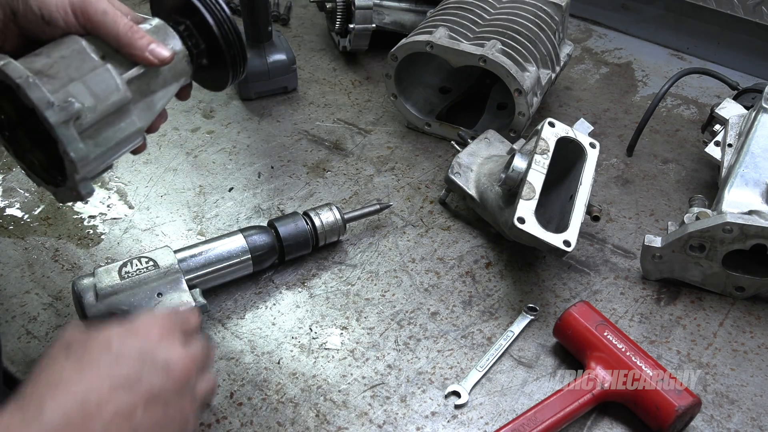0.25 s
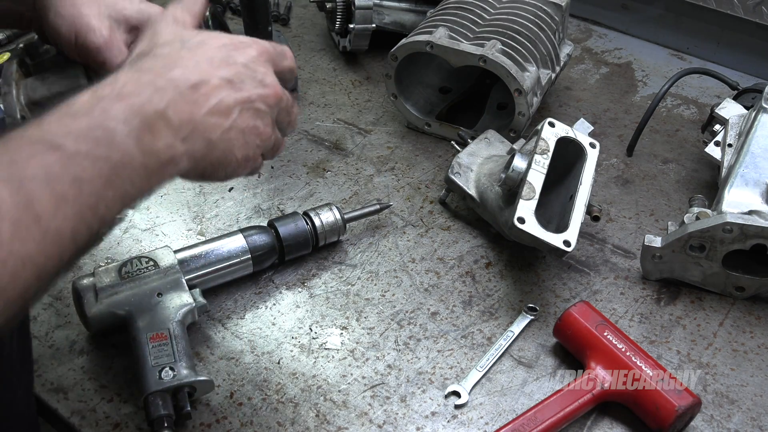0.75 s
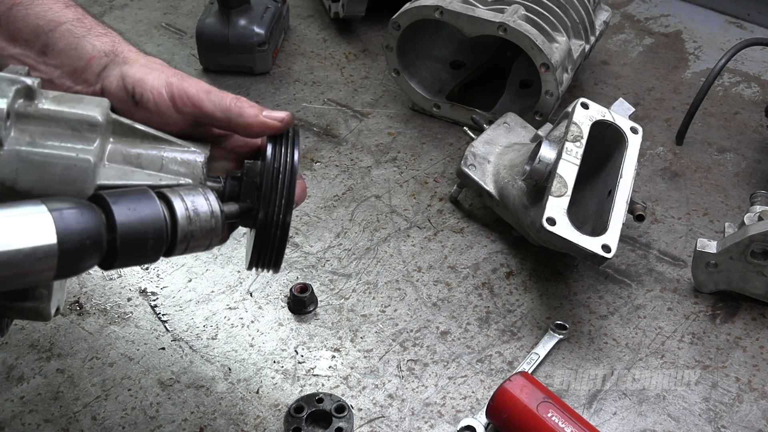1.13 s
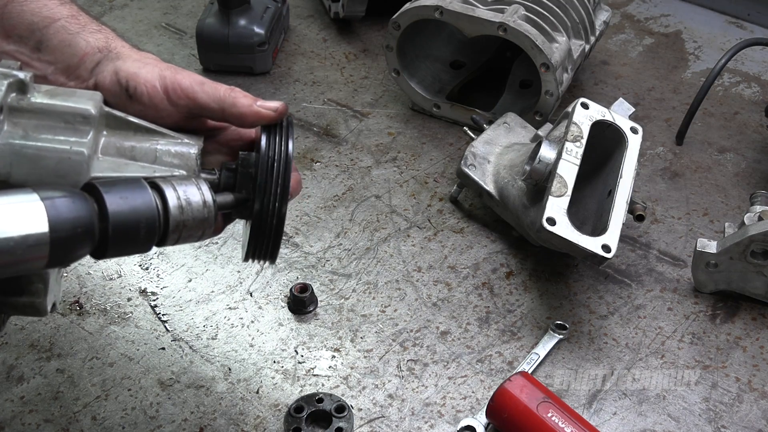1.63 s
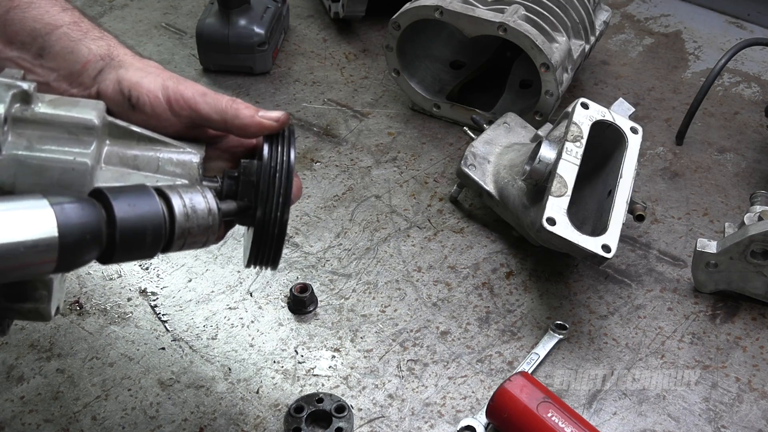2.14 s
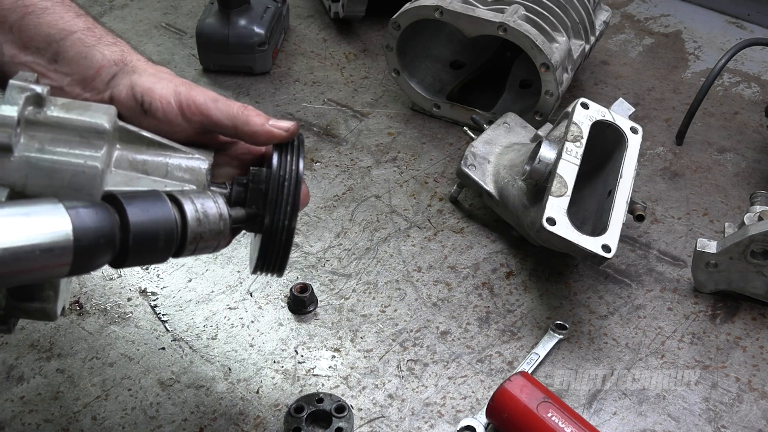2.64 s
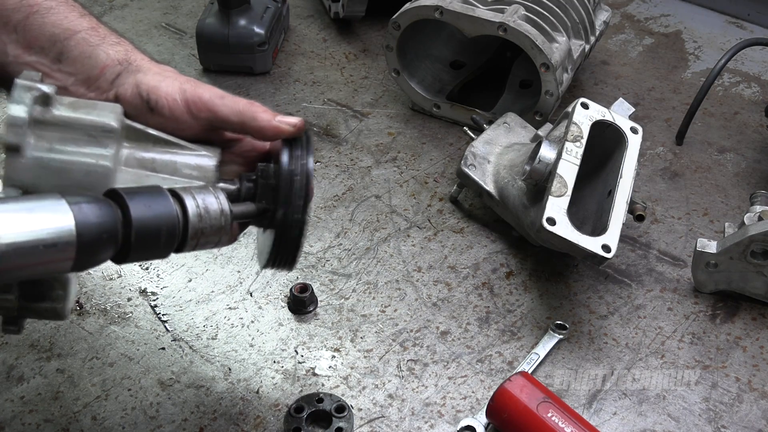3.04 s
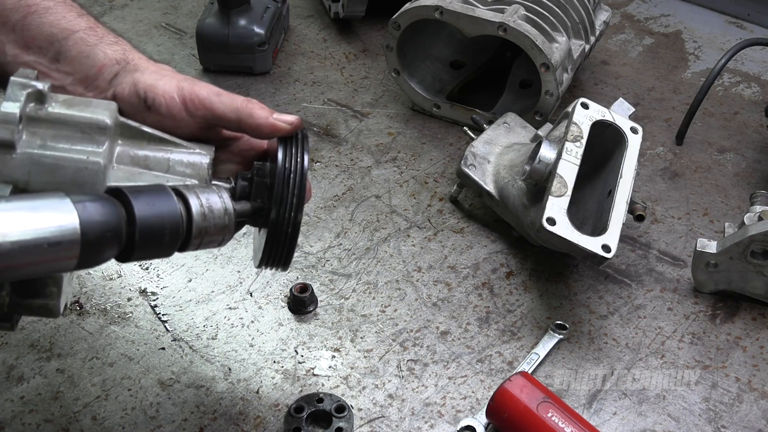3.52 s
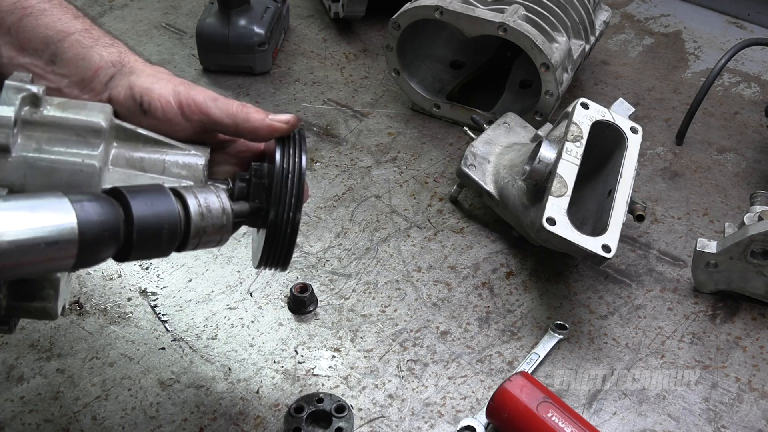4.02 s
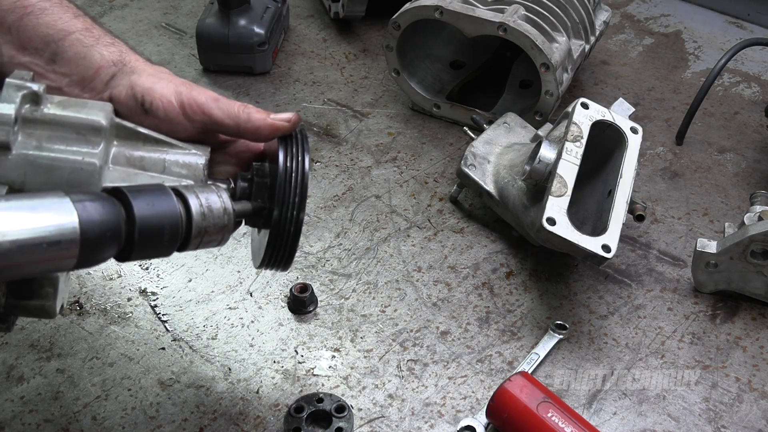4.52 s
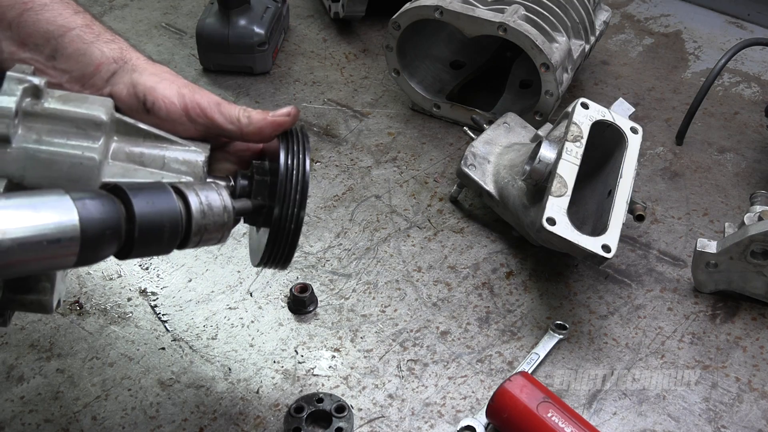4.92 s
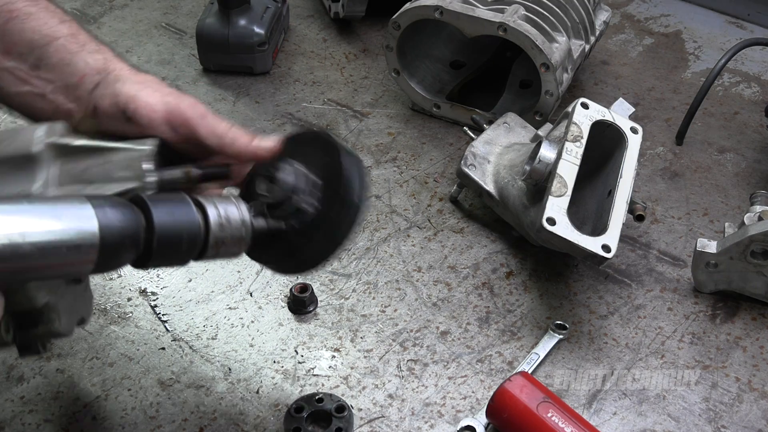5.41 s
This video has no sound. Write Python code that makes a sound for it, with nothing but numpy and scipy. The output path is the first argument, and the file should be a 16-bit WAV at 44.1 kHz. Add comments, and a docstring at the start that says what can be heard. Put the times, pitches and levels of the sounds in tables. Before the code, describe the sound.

An air hammer rattles against a steel pulley in short hissing bursts in an echoing garage, until the pulley comes free and rings.

```python
"""An air hammer drives a steel pulley off its shaft in fourteen short pulls, in a hard-walled garage.
Each pull hisses, kicks the piston and lands two to four blows, about 23 a second, which excite the
modes of the steel. The garage reverberates between pulls, over a faint rumble. The casing knocks
softly at the start; at the end the pulley comes free and sings, and the bit clinks against it.
A limiter flattens the blows."""
import sys
import numpy as np
from scipy import signal
from scipy.fft import rfft, irfft, next_fast_len
from scipy.io import wavfile
from scipy.ndimage import uniform_filter1d, minimum_filter1d

SR = 44100
rng = np.random.default_rng(int(sys.argv[2]) if len(sys.argv) > 2 else 0)


def inscribe(sig):
    """Save sig as 16-bit PCM at rate SR to the path in sys.argv[1].

    A 1-D sig is mono; a 2-D sig holds one channel per row.
    Samples are clipped to [-1, 1] before scaling.
    """
    pcm = np.round(np.clip(np.atleast_2d(sig).T, -1, 1) * 32767)
    wavfile.write(sys.argv[1], SR, pcm.astype(np.int16))


N = 249606

# background spectra: (frequency [Hz], relative level [dB])
RUMBLE_SPECTRUM = [(20, -12), (40, -9), (55, 3.5), (100, 2), (160, -15.5), (400, -22.5), (1500, -80)]
AIR_SPECTRUM = [(100, 6.5), (280, -1.5), (420, -3), (800, -1.5), (1300, -9.5), (2050, -10), (2700, -15),
                (3800, -18.5), (4600, -15), (5600, -19.5), (7800, -14), (12000, -20.5), (16000, -14)]
# course of the background: (time [s], rumble level [dB], air level [dB])
BACKGROUND_LEVELS = [(0, -43.5, -48), (.45, -40.5, -44.5), (.83, -37.5, -45), (.845, -41, -56),
                     (.92, -46, -49.5), (1.3, -71, -39), (2.6, -55, -59)]
# colour of the reverberation: (frequency [Hz], relative level [dB])
WALL_SPECTRUM = [(40, -2), (150, -6), (232, 11), (300, -0.5), (950, 5.5), (1400, 2.5), (2000, 6.5),
                 (3300, 0), (4500, 1.5), (5600, -4.5), (8800, 1.5), (10500, -6.5), (14300, -13),
                 (16000, -37)]
# reverberation times of near walls and diffuse echo: (frequency [Hz], t60 [s])
EARLY_T60 = [(7000, 0.26), (12000, .1)]
LATE_T60 = [(100, 1.1), (500, 1.4), (2000, 1.6), (4000, 1.55), (8000, 1.4), (11000, 1.15), (16000, .95)]
# the echo's loudness stays level after the last blow, longest in early pulls: (time [s], hold [s])
ECHO_HOLD = [(.92, 0.26), (2.2, 0.16), (3.6, 0.0066)]
# the top treble fades almost at once: (frequency [Hz], share of the hold [ratio])
ECHO_HOLD_SHARE = [(150, 0.44), (1000, 0.99), (4500, 0.77), (8400, 0.97), (11000, 0.1)]
# a louder echo is duller: (frequency [Hz], share of the rise above QUIET_ECHO_DB [ratio])
ECHO_RISE_SHARE = [(150, 0.93), (1000, 1), (4500, 1.1), (8400, 0.7946), (11000, 0.52)]
# resonances in the echo: the casing with the pulley tight and sliding, and the bit throughout:
# (frequency [Hz], bandwidth [Hz], relative level [dB])
CASING_TIGHT = [(2750, 530, -1), (4300, 370, -9), (8410, 200, 7)]
CASING_SLIDING = [(1970, 360, 2), (7400, 540, 2), (8130, 250, 3.5)]
BIT_RESONANCES = [(2005, 45, -4), (4115, 90, 4), (12990, 190, -6)]
# the casing rings most while the pulley moves: (time [s], relative level [dB])
CASING_RING_LEVELS = [(1.1, -5), (2.4, -0.5), (3.9, -1), (4.8, -4.5)]
# freely ringing modes: (frequency [Hz], level [dB], t60 [s])
CASING_MODES = [(850, -33, 0.047), (930, -46, 0.044), (1990, -47, .08)]
PULLEY_MODES = [(7920, -22, .85), (11350, -30, .7), (11330, -17, .06), (7900, -18, .08), (14900, -28, .05)]
BIT_MODES = [(4075, -10, 0.082), (4136, -10, 0.75), (8050, -19, 0.04), (8350, -18.5, 0.035),
             (13300, -33, .29)]
# spectra of valve hiss, air puff, slow push of air and impact: (frequency [Hz], relative level [dB])
HISS_SPECTRUM = [(300, 7.5), (1500, -1.5), (4000, 0), (7000, 3.5), (12000, -0.5), (16000, -6)]
PUFF_SPECTRUM = [(30, -0.5), (120, -8), (250, -2.5), (380, -7), (600, -12.5), (1000, -12), (2000, -67),
                 (5000, -34)]
PUSH_SPECTRUM = [(15, 2.5), (45, -15), (110, 6.5), (220, -5.5), (600, -14)]
CRACK_SPECTRUM = [(100, -16), (400, -8.5), (950, 2), (1500, -3), (2000, 1.5), (3000, -0.5), (4400, -1),
                  (5500, -9.5), (6700, -9), (8000, 3), (10000, -9.5), (13000, -13.5), (16000, -17)]
# hammered steel, pulley tight and sliding: (frequency [Hz], bandwidth [Hz], relative level [dB])
STEEL_TIGHT = [(2017, 43, 8.5), (2180, 33, -18.5), (2696, 68, -2.5), (3120, 98, -33), (3720, 59, -51.5),
               (4147, 72, 2), (4570, 46, -13), (5100, 38, -36), (7100, 28, -43), (8365, 53, 3.5),
               (9040, 120, -5), (12300, 160, -31)]
STEEL_SLIDING = [(914, 58, 2), (1985, 140, 8), (2760, 143, 0.5), (3220, 42, -8), (4008, 137, 4.5),
                 (4380, 170, 4.5), (7850, 35, -1), (7450, 13, -11), (7700, 130, -16), (8900, 7.2, 9),
                 (8700, 120, -4), (12700, 79, -0.5)]
# trigger pulls, with relative levels: (time [s], wait for first blow [s], blows [count],
# first stroke [s], lengthening per stroke [s], blow [dB], hiss [dB], kick [dB], echo [dB])
TRIGGER_PULLS = [(.918, 0.046, 3, 0.037, .004, -12.5, -16, -9.5, -18.5),
                 (1.305, 0.042, 3, 0.044, .005, -8.5, -15, -6, -22.5),
                 (1.644, 0.041, 2, .041, 0, -8.5, -17.5, -12, -23),
                 (1.930, 0.034, 3, 0.042, .003, -7.5, -22, -13.5, -23),
                 (2.222, 0.042, 3, 0.037, .007, -7, -23, -15, -25),
                 (2.705, .043, 2, 0.042, 0, -11.5, -26.5, -15.5, -26),
                 (3.02, 0.037, 3, 0.036, .006, -8, -30.5, -23.5, -24),
                 (3.467, .038, 3, .041, .027, -12, -32, -20.5, -28.5),
                 (3.777, 0.048, 2, 0.038, 0, -10, -32.5, -19, -25),
                 (4.106, .039, 2, .044, 0, -11.5, -28, -18.5, -27),
                 (4.432, 0.037, 2, 0.047, 0, -12.5, -35.5, -21, -28.5),
                 (4.685, 0.033, 2, 0.046, 0, -11, -37, -22, -26),
                 (4.969, .034, 2, 0.044, 0, -11, -44, -20.5, -27),
                 (5.259, 0.043, 4, 0.037, .013, -12, -29, -19.5, -27.5)]

KNOCK_S, RELEASE_S, CLINK_S = 0.585, 5.392, 5.6405
FIRST_CLATTER_S, CLATTER_S, LATE_SHORTENS_S, FADE_DB = 0.007, 0.011, 0.04, 1.4
EARLY_DB, QUIET_ECHO_DB, SWELL_S = -26, -27.5, 0.15


def amp(db):
    """Amplitude grows tenfold for every 20 dB."""
    return 10 ** (np.asarray(db) / 20)


def along(points, hz):
    """Interpolation of (frequency [Hz], value) points on a logarithmic frequency axis."""
    frequencies, values = np.transpose(points)
    return np.interp(np.log(hz + 1), np.log(frequencies), values)


def curves(rows):
    """Linear interpolation in time: one value per sample for each column after the first."""
    times, *columns = np.transpose(rows)
    return [np.interp(np.arange(N) / SR, times, column) for column in columns]


def filtered(x, response):
    """Linear filtering multiplies spectra; the response is scaled to keep the power of white noise."""
    size = next_fast_len(len(x) + SR // 4)
    gain = response(np.fft.rfftfreq(size, 1 / SR))
    return irfft(rfft(x, size) * gain / np.sqrt(np.mean(np.abs(gain) ** 2)), size)[:len(x)]


def noise(spectrum):
    """Spectral shaping turns white noise into coloured noise of rms 1."""
    x = filtered(rng.standard_normal(N), lambda hz: amp(along(spectrum, hz)))
    return x / np.sqrt(np.mean(x ** 2) + 1e-20)


def resonate(x, modes):
    """Modal superposition: x drives second-order resonators, summed with alternating sign."""
    def response(hz):
        return sum((-1) ** k * amp(db) * 1j * hz * width / (centre ** 2 - hz ** 2 + 1j * hz * width)
                   for k, (centre, width, db) in enumerate(modes))
    return filtered(x, response)


def sliding(x, tight, loose):
    """Equal-power crossfade: most of the energy passes to the loose modes as the pulley slides."""
    slid = curves([(2.3, 0.21), (3.2, 0.84)])[0]
    return np.sqrt(1 - slid) * resonate(x, tight) + np.sqrt(slid) * resonate(x, loose)


def bursts(source, rows, rise_s, steepness):
    """Envelopes with a power-law tail cut noise into bursts (time [s], level [dB], length [s])."""
    out, t = np.zeros(N + SR), np.arange(SR // 8) / SR
    for s, db, length in rows:
        start = round(s * SR)
        envelope = (1 - np.exp(-t / rise_s)) / np.sqrt(1 + (t / length) ** steepness)
        burst = envelope * source[start:start + len(t)]
        out[start:start + len(t)] += amp(db) * burst * np.linalg.norm(envelope) / np.linalg.norm(burst)
    return out[:N]


def background():
    """Ambient noise: a low rumble sinks as the work starts; faint air swells, then sinks too."""
    rumble_db, air_db = curves(BACKGROUND_LEVELS)
    return amp(rumble_db) * noise(RUMBLE_SPECTRUM) + amp(air_db) * noise(AIR_SPECTRUM)


def interference(x, depth_db):
    """Reflections add and cancel at random, leaving a fine ripple along the spectrum."""
    grid_hz = np.arange(0, SR / 2, 28)
    ripple_db = depth_db * rng.standard_normal(len(grid_hz))
    return filtered(x, lambda hz: amp(np.interp(hz, grid_hz, ripple_db)))


def echo_power(pull, hz, t):
    """The echo's loudness swells from the trigger, stays level briefly after the last blow, then fades."""
    start, *_, echo_db = pull
    level_db = QUIET_ECHO_DB + (echo_db - QUIET_ECHO_DB) * along(ECHO_RISE_SHARE, hz)
    swell = np.clip((t - start) / SWELL_S, 0, 1)
    hold_s = np.interp(start, *np.transpose(ECHO_HOLD)) * along(ECHO_HOLD_SHARE, hz)
    last_blow_s = strokes(pull)[-1][0]
    decaying_s = np.maximum(t - last_blow_s - hold_s, 0)
    return swell * amp(level_db - 60 * decaying_s / along(LATE_T60, hz)) ** 2


def garage():
    """Incoherent reflections add in power: an early echo for each blow, a diffuse one for each pull."""
    casing = sliding(rng.standard_normal(N), CASING_TIGHT, CASING_SLIDING)
    casing *= amp(curves(CASING_RING_LEVELS)[0])
    diffuse = interference(amp(-2) * noise(WALL_SPECTRUM) + casing, depth_db=2)
    diffuse += amp(-7) * resonate(rng.standard_normal(N), BIT_RESONANCES)
    hz, t, spectrogram = signal.stft(diffuse, SR, nperseg=512)
    early_t60 = along(EARLY_T60, hz[:, None])
    early = sum((t > s) * amp(EARLY_DB - 60 * np.maximum(t - s, 0) / early_t60) ** 2
                for s, _, _ in blows())
    late = sum(echo_power(pull, hz[:, None], t) for pull in TRIGGER_PULLS)
    return signal.istft(spectrogram * np.sqrt(early + late), SR)[1][:N]


def struck_steel(start_s, modes, rise_s, flutter):
    """Free vibration: each mode decays exponentially and flutters as the piece moves in the hand."""
    t = np.maximum(np.arange(N) / SR - start_s, 0)
    knots_s = np.arange(0, 2, 0.007)
    ring = np.zeros(N)
    for hz, db, t60 in modes:
        jitter = rng.standard_normal(len(knots_s)) + 1j * rng.standard_normal(len(knots_s))
        sway = np.interp(t, knots_s, 1 + flutter * jitter)  # in amplitude and phase
        ring += amp(db - 60 * t / t60) * np.imag(sway * np.exp(2j * np.pi * hz * t))
    return (1 - np.exp(-t / rise_s)) * ring


def barrel_thumps(rows, hz, peak_s):
    """Heavily damped oscillation: each thump (time [s], level [dB]) is a few cycles at a pitch near hz."""
    out, t = np.zeros(N + SR), np.arange(SR // 16) / SR
    envelope = t / peak_s * np.exp(1 - t / peak_s)
    for (s, db), detune in zip(rows, rng.standard_normal(len(rows))):
        pitch_hz = hz * np.exp(0.11 * detune)
        out[round(s * SR):][:len(t)] += amp(db) * envelope * np.sin(2 * np.pi * pitch_hz * t)
    return out[:N]


def exhaust():
    """Pressure release: the piston vents just before a blow, with a thump, a puff and a slow push."""
    vents = [(s, db) for s, db, _ in blows() if s < RELEASE_S + 0.03]
    thump = barrel_thumps([(s - 0.005, db) for s, db in vents], hz=293, peak_s=0.0012)
    puffs = [(s - 0.004, db - 8, 0.009) for s, db in vents]
    puff = bursts(noise(PUFF_SPECTRUM), puffs, rise_s=0.00094, steepness=3.23)
    pushes = [(s - 0.002, db, 0.03) for s, db in vents]
    push = bursts(noise(PUSH_SPECTRUM), pushes, rise_s=0.0018, steepness=7.4)
    return amp(-8) * thump + puff + amp(-18.5) * push


def trigger():
    """Flow noise: the valve opens with a hiss, and a moment later air pressure kicks the piston back."""
    hisses = [(s, hiss_db, 0.021) for s, *_, hiss_db, kick_db, echo_db in TRIGGER_PULLS]
    hiss = bursts(noise(HISS_SPECTRUM), hisses, rise_s=0.0021, steepness=3.8)
    kicks = [(s + 0.01488, kick_db) for s, *_, kick_db, echo_db in TRIGGER_PULLS]
    kicks.append((0.915, -10.5))  # the tool fills on the first pull
    puffs = [(s, db, 0.012) for s, db in kicks]
    puff = bursts(noise(PUFF_SPECTRUM), puffs, rise_s=0.00067, steepness=1.7)
    return hiss + amp(-9.5) * puff + barrel_thumps(kicks, hz=248, peak_s=0.0038)


def strokes(pull):
    """Falling air pressure slows the piston; from the third blow on, each is softer and shorter."""
    start, wait, count, stroke, slowing, db = pull[:6]
    rows, s = [], start + wait
    for k in range(round(count)):
        spent = max(k - 1, 0)
        clatter_s = CLATTER_S if k else FIRST_CLATTER_S
        clatter_s *= np.exp(-slowing * spent / LATE_SHORTENS_S)
        rows.append((s, db - FADE_DB * spent ** 2, clatter_s))
        s += stroke + slowing * k
    return rows


def blows():
    """The impact train of all pulls: (time [s], level [dB], clatter length [s])."""
    return [blow for pull in TRIGGER_PULLS for blow in strokes(pull)]


def hammer():
    """Impact excitation: the bit clatters on the hub, giving a broad crack and driving the steel modes."""
    crack = bursts(noise(CRACK_SPECTRUM), blows(), rise_s=0.00054, steepness=7.4)
    clatter = bursts(rng.standard_normal(N), blows(), rise_s=0.0001, steepness=4.9)
    ring_gain = amp(curves([(1.5, 0), (2.8, -4.5)])[0])  # a tight pulley rings more purely
    return amp(-2) * crack + ring_gain * sliding(clatter, STEEL_TIGHT, STEEL_SLIDING)


def scene():
    """Superposition: the pressures of tool, steel and garage add in one channel."""
    knock = struck_steel(KNOCK_S, CASING_MODES, rise_s=0.0027, flutter=0.34)
    pulley = struck_steel(RELEASE_S, PULLEY_MODES, rise_s=0.001, flutter=0.55)
    clink = struck_steel(CLINK_S, BIT_MODES, rise_s=0.0015, flutter=0.17)
    return (hammer() + trigger() + exhaust() + knock + pulley + clink + garage() + background())[None]


def record(dry):
    """Peak limiting: the gain drops at a loud blow and recovers slowly enough to duck the echo."""
    ceiling_db, release_db_per_s, band_limit_hz = -3.8, 110, 15900
    excess_db = np.maximum(20 * np.log10(np.abs(dry[0]) + 1e-9) - ceiling_db, 0)
    release_db = release_db_per_s * np.arange(N) / SR
    held_gain = amp(release_db - np.maximum.accumulate(excess_db + release_db))
    gain = uniform_filter1d(minimum_filter1d(held_gain, size=40), size=30)
    passband = np.fft.rfftfreq(2 * N, 1 / SR) < band_limit_hz
    return irfft(rfft(dry * gain, 2 * N) * passband)[:, :N]


dry = scene()
out = record(dry)
inscribe(out)
```